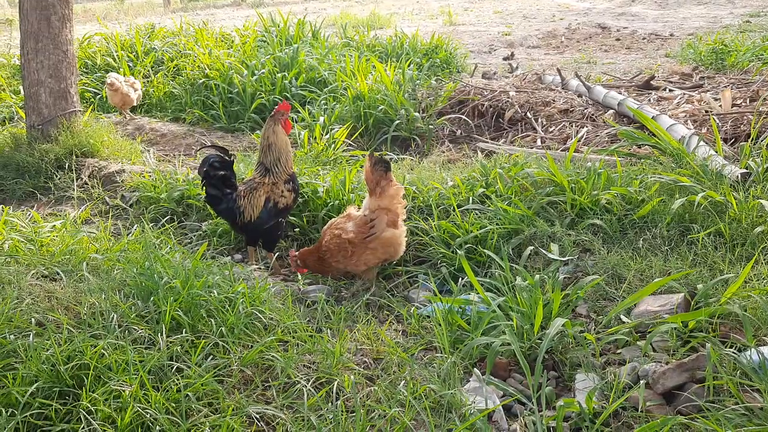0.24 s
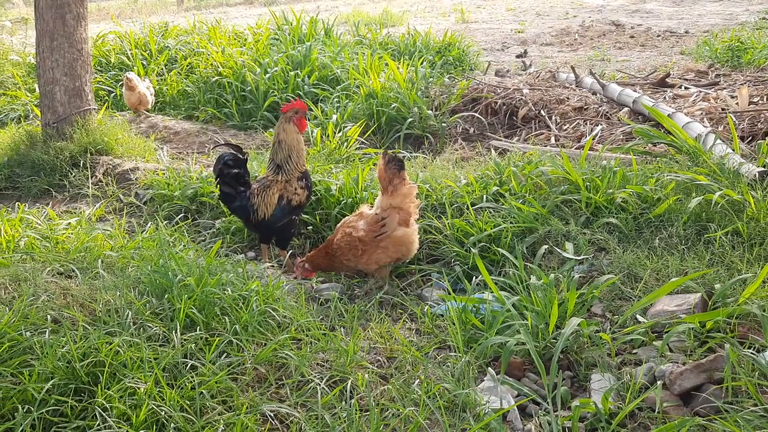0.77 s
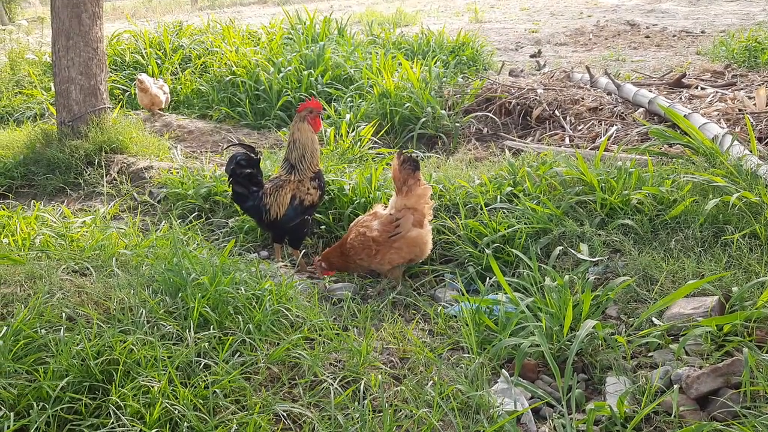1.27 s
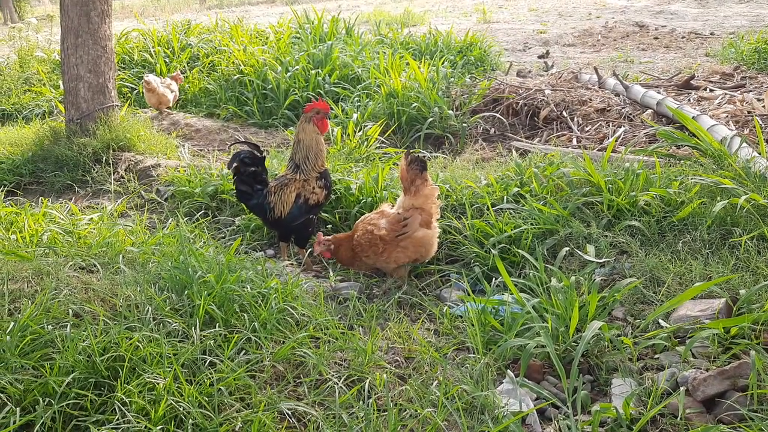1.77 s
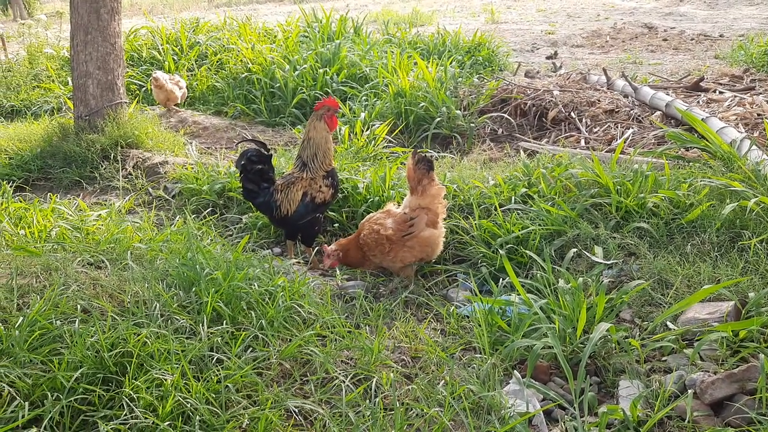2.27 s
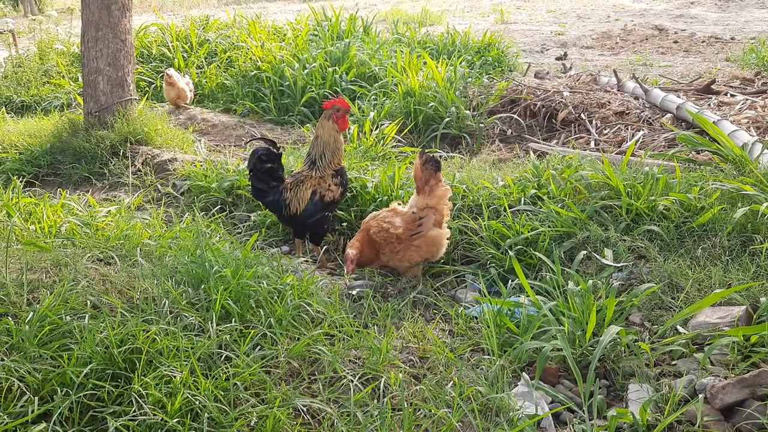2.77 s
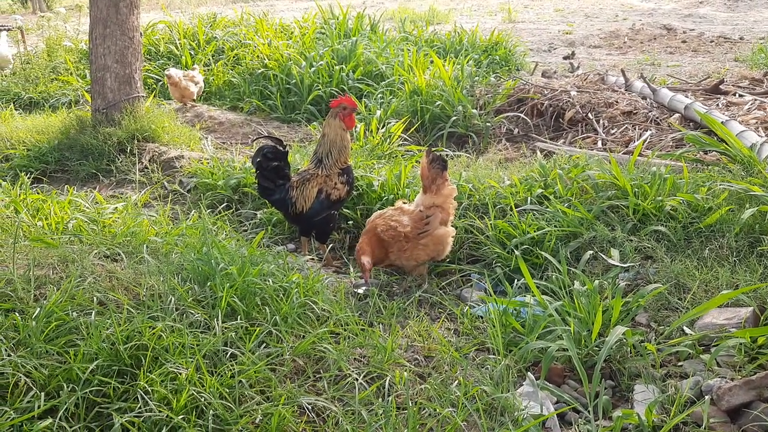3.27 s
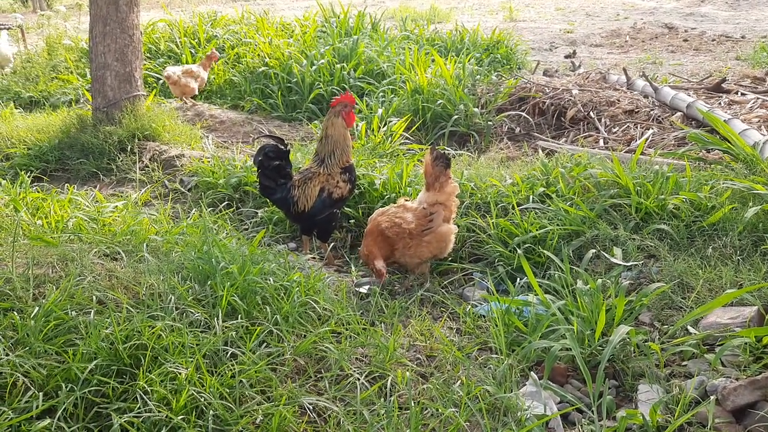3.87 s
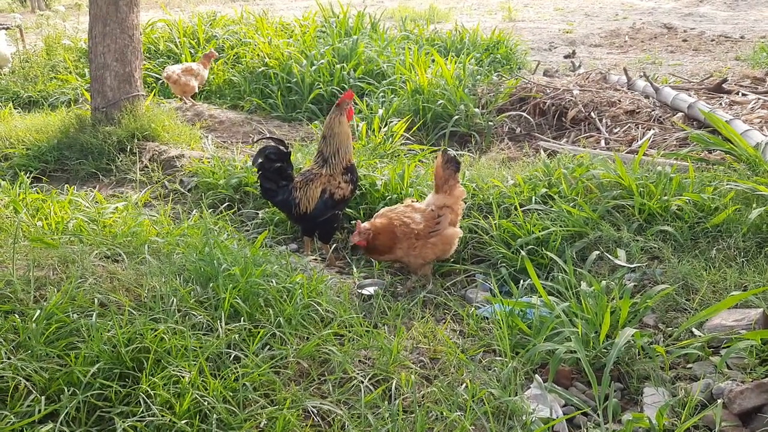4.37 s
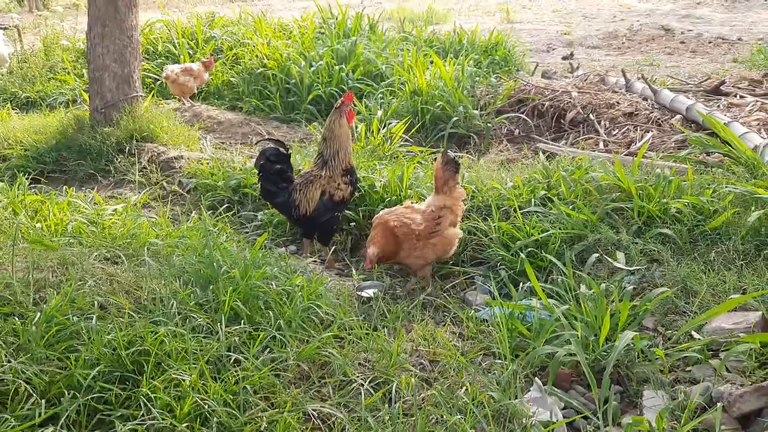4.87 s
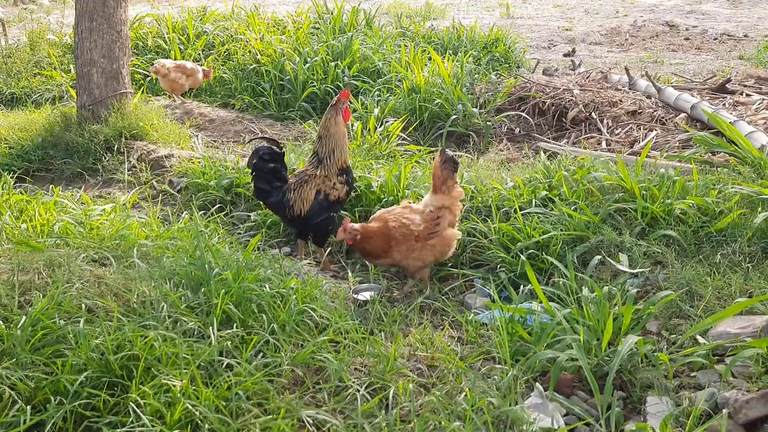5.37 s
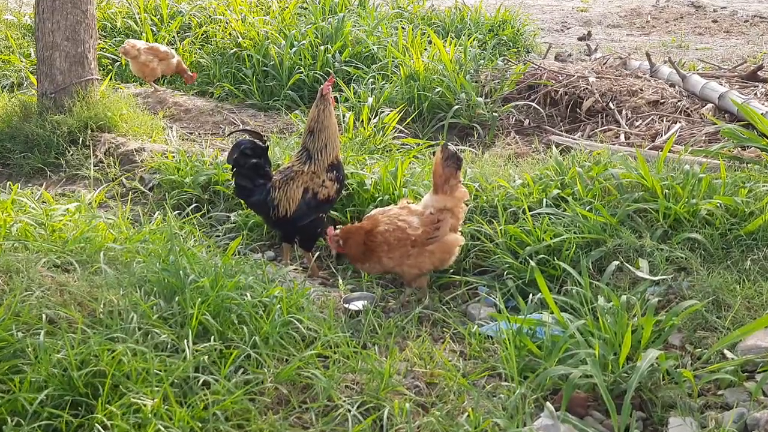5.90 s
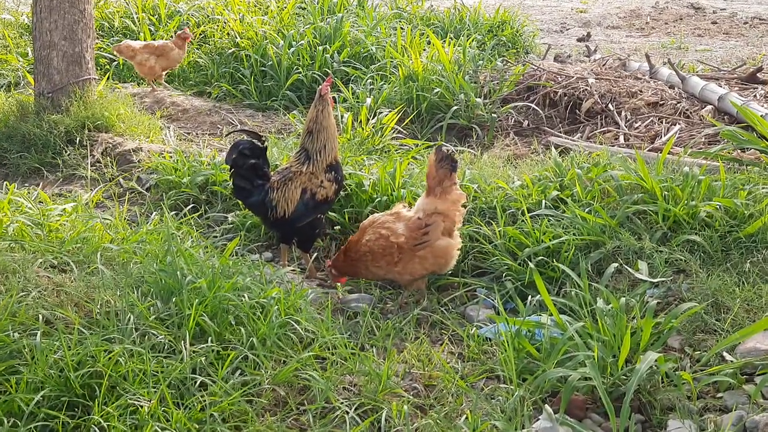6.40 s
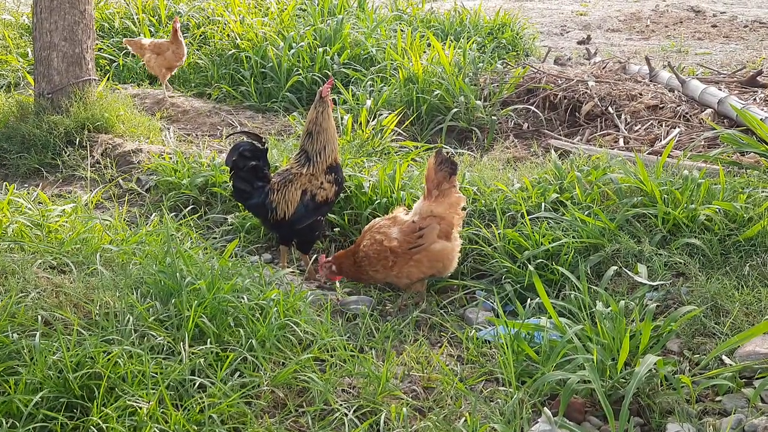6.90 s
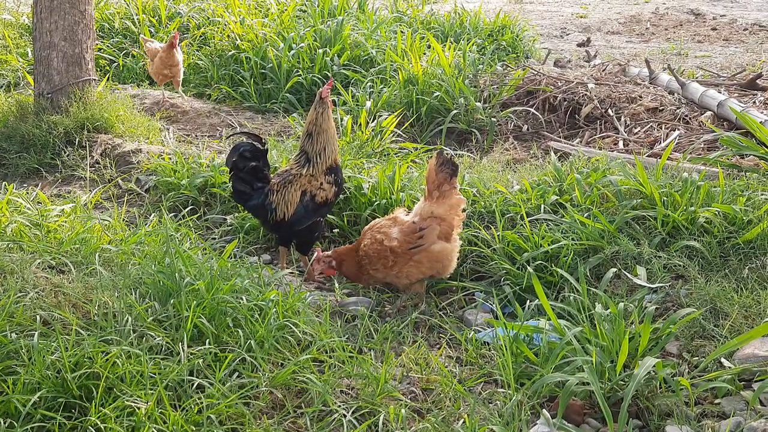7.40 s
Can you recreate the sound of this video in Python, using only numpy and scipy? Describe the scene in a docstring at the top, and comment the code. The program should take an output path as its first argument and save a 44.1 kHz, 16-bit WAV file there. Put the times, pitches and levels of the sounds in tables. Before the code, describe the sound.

Rural yard with quick bird chirps, distant drawn-out hen calls and soft clucks, loud handling bumps early on, and two sharp hen squawks near the end.

```python
"""A walled rural yard with chickens, heard through a hand-held camera's two microphone ports.
Nearest, a hen gives two shrill squawks; across the yard come soft clucks and, further off, drawn-out calls and hoots.
A small songbird whistles slurs and a run of chirps, other birds answer faintly, and the walls echo them all.
Fingers tap and rub the case beside the right port, then cover it and shut out the low rumble there.
Voices are harmonics and rasp, whistles gliding sines, taps ringing modes, the rest shaped noise."""
import sys
import numpy as np
from scipy import signal
from scipy.fft import rfft, irfft, next_fast_len
from scipy.io import wavfile
from scipy.ndimage import uniform_filter1d, map_coordinates

SR = 44100
rng = np.random.default_rng(int(sys.argv[2]) if len(sys.argv) > 2 else 0)


def persist_wave(psi):
    """Save psi, clipped to +-1, as 16-bit WAV."""
    counts = np.round(np.clip(psi, -1, 1) * 32767).astype(np.int16)
    wavfile.write(sys.argv[1], SR, np.atleast_2d(counts).T)


N = 337365
TOP_HZ = 16100  # the microphones' upper band limit


def amp(db):
    """Decibels to a linear gain."""
    return 10 ** (np.asarray(db) / 20)


def unit(x):
    """x scaled to rms 1."""
    return x / np.sqrt(np.mean(x ** 2) + 1e-20)


def along(points, hz):
    """Rows of (frequency_hz, value) read at hz along a log axis."""
    point_hz, values = np.transpose(points)
    return np.interp(np.log(hz + 1), np.log(point_hz + 1), values)


def curves(rows):
    """One value per sample of the whole scene for each column after the time."""
    times_s, *columns = np.transpose(rows)
    return [np.interp(np.arange(N) / SR, times_s, column) for column in columns]


def gesture(rows):
    """The columns of one call, sample by sample from its start to its end."""
    times_s, *columns = np.transpose(rows)
    t = np.arange(times_s[0], max(times_s[-1], times_s[0] + .01), 1 / SR)
    return [np.interp(t, times_s, column) for column in columns]


def wobble(rate, size):
    """A smooth random curve with rate knots a second."""
    knots = rng.standard_normal(int(size * rate / SR) + 4)
    return map_coordinates(knots, [np.arange(size) * rate / SR])


def filtered(x, response):
    """x with its spectrum multiplied by a function of frequency."""
    size = x.shape[-1]
    padded = next_fast_len(size + 8192)
    gains = response(np.fft.rfftfreq(padded, 1 / SR))
    return irfft(rfft(x, padded) * gains, padded)[..., :size]


def noise(spectrum):
    """Noise coloured by (frequency_hz, db) points, at rms 1."""
    return unit(filtered(rng.standard_normal(N), lambda hz: amp(along(spectrum, hz))))


def add(track, start_s, x):
    """Mix x into the track at start_s, trimmed to the track's ends."""
    start = round(start_s * SR)
    x = x[max(-start, 0):]
    part = track[max(start, 0):][:len(x)]
    part += x[:len(part)]


def whistle(rows, waver):
    """A nearly pure note: one sine whose pitch and strength are slightly unsteady."""
    hz, db = gesture(rows)
    size = len(hz)
    phase = 2 * np.pi * np.cumsum(hz * (1 + waver * wobble(160, size))) / SR
    strength = np.sqrt(2) * amp(db + 1.7 * wobble(64, size))
    return strength * np.sin(phase) * signal.windows.tukey(size, .1)


def sing(syllable, notes, waver):
    """One whistled syllable sung once for each row of (start_s, pitch_ratio, level_db)."""
    out = np.zeros(N)
    for start_s, ratio, db in notes:
        note = whistle(np.array(syllable) * [1, ratio, 1], waver)
        add(out, start_s + syllable[0][0], amp(db) * note)
    return out


def voice(hz, rough, throat, jitter):
    """Harmonics through a throat near rms 1; roughness shakes the pitch and adds rasp once a cycle."""
    size = len(hz)
    rough = np.clip(rough, 0, 1)
    phase = 2 * np.pi * np.cumsum(hz * (1 + jitter * rough * wobble(700, size))) / SR
    k = np.arange(1, 15)[:, None]  # harmonic numbers
    gains = amp(along(throat, k * hz)) * (k * hz < TOP_HZ)
    flutter = amp(3 * np.array([wobble(220, size) for _ in k]))
    harmonics = gains * flutter * np.sin(k * phase)
    tone = np.sqrt(2) * harmonics.sum(0) / np.linalg.norm(gains, axis=0)
    breath = rng.standard_normal(size) * (1 + np.cos(phase))
    rasp = unit(filtered(breath, lambda f: amp(along(throat, f))))
    return (np.sqrt(1 - rough ** 2) * tone + rough * rasp) * signal.windows.tukey(size, .08)


# pieces of the two squawks as the voice breaks; rows: start_s, pitch_hz, level_db, roughness (0-1)
SQUAWK_PIECES = [
    [(6.54, 781, -61, .35), (6.552, 860, -49, .35), (6.562, 1000, -45, .35), (6.572, 1214, -39, .5),
     (6.582, 1280, -42, .55)],
    [(6.572, 3667, -52, .15), (6.59, 3885, -39.5, .13), (6.612, 3962, -34, .12), (6.63, 3780, -36, .15),
     (6.647, 3520, -33.5, .15), (6.662, 3350, -52, .15)],
    [(6.655, 1242, -45, .5), (6.675, 1080, -43, .7), (6.69, 880, -52, .5)],
    [(6.662, 3575, -46, .05), (6.675, 3850, -40, .25), (6.693, 3960, -45, .2), (6.73, 3590, -53, .2)],
    [(6.822, 1700, -57, .35), (6.835, 1952, -44, .4), (6.85, 2284, -48, .35), (6.876, 2666, -46, .3),
     (6.902, 2480, -52, .5)],
    [(6.9, 2250, -43, .3), (6.91, 1980, -33, .2), (6.927, 1790, -37, .18), (6.945, 1520, -44, .3),
     (6.956, 1380, -54, .4)],
]
# resonance of the squawking throat: frequency_hz, gain_db
SQUAWK_THROAT = [(600, -49), (1300, -18), (2000, -19.5), (2700, -5), (3700, 5.5), (4400, -2), (5400, -9),
                 (6500, -3), (7800, -20), (9500, -25), (13000, -40), (16000, -45.5)]


def squawks():
    """A harsh start breaks into a shrill whistle and back; a second cry arches and falls."""
    out = np.zeros(N)
    for piece in SQUAWK_PIECES:
        hz, db, rough = gesture(piece)
        # the rougher the cry, the more its strength stutters
        stutter = unit(amp(9 * np.clip(rough, 0, .5) * wobble(260, len(hz))))
        cry = voice(hz, rough, SQUAWK_THROAT, jitter=.06)
        add(out, piece[0][0], amp(db) * stutter * cry)
    return out


# soft clucks across the yard: start_s, length_s, pitch_hz (mid-cluck), level_db
CLUCK_NOTES = [(3.286, 0.022, 423, -60.5), (3.34, 0.052, 447, -70.5), (3.686, 0.026, 233.7, -54),
               (3.714, 0.023, 243.5, -64), (3.911, 0.038, 258, -54.5), (4.089, 0.023, 301.4, -64.5)]
# resonance of the clucking throat: frequency_hz, gain_db
LOW_THROAT = [(250, -5.5), (480, 9), (800, 2.5), (1150, 3), (1800, 1), (2600, -37), (5000, -35.5)]


def clucks():
    """Short low voiced notes from across the yard, each sinking in pitch through its middle."""
    out = np.zeros(N)
    for start_s, length_s, hz, db in CLUCK_NOTES:
        size = int(length_s * SR)
        sinking_hz = hz * np.linspace(1.1, .9, size)
        cluck = voice(sinking_hz, 0.44, LOW_THROAT, jitter=0.18)
        add(out, start_s, amp(db) * np.sqrt(np.hanning(size)) * cluck)
    return out


# the far hen's call sags, climbs to a crest and drops: start_s (from the crest), pitch_hz, level_db
CALL_SHAPE = [(-.41, 1320, -4), (-.33, 1175, -8.5), (-.21, 1140, -10.5), (-.09, 1240, -5.5),
              (0, 1420, -1.5), (.06, 1290, -8.5), (.11, 1170, -19)]
# her calls: start_s (at the crest), pitch_ratio, level_db
CALLS = [(-.01, 1, -68), (.66, .98, -76), (2.28, 1, -65), (4.29, 1.02, -66), (4.77, 1.09, -78),
         (5.95, 1, -68), (7.66, 1, -66)]
# faint low hoots from far away: start_s, length_s, pitch_hz, level_db
FAR_HOOTS = [(.28, .3, 400.6, -64), (.85, 0.97, 254.8, -67.5), (2.352, 0.42, 605, -71)]


def far_calls():
    """Thin drawn-out whistled calls and level low hoots, slightly unsteady in strength."""
    out = sing(CALL_SHAPE, CALLS, waver=0.008)
    for start_s, length_s, hz, db in FAR_HOOTS:
        add(out, start_s, whistle([(0, hz, db), (length_s, hz, db)], waver=0.013))
    return out * amp(1.1 * wobble(23.5, N))


# the songbird's three syllables, each: start_s (within the syllable), pitch_hz, level_db
SLUR_SHAPE = [(0, 3770, -10), (.025, 4343, -9.5), (.055, 4920, -5.5), (.08, 5500, -1.5), (.092, 5700, -11),
              (.105, 5302, -23)]
PIP_SHAPE = [(0, 6570, 3.5), (.015, 6950, -5.5), (.04, 6900, -12), (.07, 6700, -26.5)]
FLICK_SHAPE = [(0, 4502, -5.5), (.012, 4250, -2), (.035, 3600, -13), (.045, 3875, -8), (.056, 5000, -1.5),
               (.066, 6200, -5.5)]
# its opening slurs: start_s, pitch_ratio, level_db
OPENING_SLURS = [(0.846, .95, -63), (1.085, 1.07, -57), (1.3, 1.014, -52), (1.504, 1, -52),
                 (1.7, .96, -54.5)]
# its run, each beat a high pip then a flick: start_s, pip_level_db, flick_level_db
RUN_BEATS = [(1.849, -53.5, -57), (2.059, -53, -57), (2.269, -55, -54.5), (2.474, -58.5, -57),
             (2.685, -51, -53), (2.901, -53.5, -57), (3.118, -54.5, -55.5), (3.333, -55.5, -59.5)]


def songbird():
    """Rising whistled slurs lead into a run of pips and flicks; the flicks sink in pitch as it goes on."""
    slur_pip_s, slur_pip_db = 0.13, -8  # a softer pip links each slur to the next
    flick_after_s, flick_ratio, flick_sag_per_s = .076, 0.96, 0.032
    pips = [(s + slur_pip_s, 1, db + slur_pip_db) for s, _, db in OPENING_SLURS[:-1]]
    pips += [(s, 1, db) for s, db, _ in RUN_BEATS]
    flicks = []
    for start_s, _, db in RUN_BEATS:
        ratio = flick_ratio - flick_sag_per_s * (start_s - RUN_BEATS[0][0])
        flicks.append((start_s + flick_after_s, ratio, db))
    song = sing(SLUR_SHAPE, OPENING_SLURS, waver=0.019)
    song += sing(PIP_SHAPE, pips, waver=0.019)
    return song + sing(FLICK_SHAPE, flicks, waver=0.019)


# another bird's falling chirp: start_s (within the chirp), pitch_hz, level_db
FALL_SHAPE = [(0, 5480, -1), (.045, 4457, 6), (.095, 3500, -0.5), (.15, 2946, -9.5)]
# its chirps: start_s, pitch_ratio, level_db
FALLING_CHIRPS = [(5.67, 1, -71), (5.955, 1.02, -68.5), (6.21, 1, -75), (7.08, .97, -67),
                  (7.445, 1.03, -69.5)]
# thin bent peeps of birds further off: start_s, length_s, start_hz, middle_hz, end_hz, level_db
BENT_PEEPS = [(0.817, .13, 3330, 3750, 3840, -66.5), (3.294, 0.15, 2150, 2410, 2290, -75),
              (3.336, 0.11, 1700, 1800, 1695, -73.5), (4.51, .05, 3850, 3950, 4700, -68),
              (4.57, .05, 3850, 3980, 4300, -69), (4.64, .18, 4760, 4450, 3900, -70),
              (4.87, .08, 4550, 4790, 4680, -67), (4.96, .13, 2275, 2540, 2620, -77),
              (5.12, .12, 4700, 4400, 4150, -68), (5.24, .06, 4700, 5400, 5700, -72),
              (5.28, .22, 4100, 3920, 4100, -72), (7.079, .08, 2100, 2187, 2150, -73.5)]


def other_birds():
    """Falling chirps and thin peeps, gliding sines whose strength flickers."""
    out = sing(FALL_SHAPE, FALLING_CHIRPS, waver=.04)
    u = np.linspace(0, 1, 12)
    for start_s, length_s, *pitches_hz, db in BENT_PEEPS:
        # a parabola through the three pitches
        bend_hz = np.polyval(np.polyfit([0, .5, 1], pitches_hz, 2), u)
        rows = np.column_stack([length_s * u, bend_hz, np.full_like(u, db)])
        add(out, start_s, whistle(rows, waver=0.014))
    return out * amp(1.5 * wobble(45, N))


# how long the yard's tail takes to die by 60 dB: frequency_hz, decay_s
YARD_DECAY = [(300, 0.2), (2000, 0.84), (4000, 0.68), (8000, 1), (15000, .3)]


def yard(x, walls, wet_db):
    """Direct sound, a few wall echoes and a scattered noise tail, at both ports."""
    hz, t, z = signal.stft(rng.standard_normal((2, SR)), SR, nperseg=256)
    decay = amp(-60 * t / along(YARD_DECAY, hz)[:, None])
    tail = signal.istft(z * decay, SR, nperseg=256)[1]
    tail = tail / np.linalg.norm(tail[0])
    out = amp(wet_db) * signal.fftconvolve(x[None], tail, axes=1)[:, :N]
    add(out[0], .0004, x)  # the left port is further from the birds
    add(out[1], 0, x)
    for delay_s, left_db, right_db in walls:
        add(out[0], delay_s, amp(left_db) * x)
        add(out[1], delay_s, amp(right_db) * x)
    return out


# fingers knocking on the case: start_s, thud_db, knock_db, tick_db, port_ring_db
FINGER_TAPS = [(0.19, -23, -30, -33, -14), (0.275, -24, -35, -13.5, -16), (0.528, -30, -39, -33, -13),
               (0.594, -29, -48, -15, -17), (0.7386, -29, -35, -20, -16), (0.7502, -3, -35, -8, -23),
               (0.7528, -19, -13.5, -15, -17), (0.7887, -16, -30, -5.5, -8.5),
               (0.8207, -19, -31, -12.5, -16), (1.8094, -5, -30, -17.5, -12.5),
               (1.8872, 13.5, 16.5, -2, 12), (1.8952, 8, 10, -26, 3.5), (1.9908, -10.5, -9, -34, -24),
               (2.4442, 12.5, 16, 5, 11.5), (2.5279, -19, -31, -12.5, -15.5), (2.7721, -29, -39, -22, -12),
               (3.53, 17.5, 19.5, 12, 16), (3.5375, 8, -17, -27.5, -28), (3.5469, 0.5, -26, -9, -23),
               (3.5582, -27.5, -12.5, -6.5, -4), (3.5603, 13, 3, -30, -34), (3.8898, 10, 16.5, 8.5, 13.5),
               (3.8999, 5, -27.5, -26, -14), (3.9917, 5, 4.5, -2, -17), (4.2858, 6.5, 8, 5.5, -70),
               (4.3437, 12, 20.5, 9, 9), (4.3723, 8.5, 12.5, 13, -28.5), (4.3837, 3.5, -23, 2.5, -31),
               (4.4042, 14.5, 7, -48, -3), (4.4611, -17, -21, -11, -7)]
# resonant modes of those four parts, each: centre_hz, width_hz, level_db (relative)
THUD_MODES = [(248, 285, -2.5), (560, 580, 0)]
KNOCK_MODES = [(1284, 710, -3), (2130, 1210, -7)]
TICK_MODES = [(3270, 650, -2.3), (4346, 660, -2)]
PORT_MODES = [(6410, 920, 2.5), (10550, 450, -1), (13500, 990, -29)]
# what passes through the case from right port to left: frequency_hz, gain_db
CASE_PATH = [(150, -28.5), (550, -11), (1200, -23.5), (2500, -27.5), (6000, -40.5), (15000, -45.5)]


def taps():
    """Each knock rings the case and the right port; only a dull, smeared thud reaches the left one."""
    out = np.zeros((2, N))
    t = np.arange(2048) / SR
    f = np.fft.rfftfreq(len(t), 1 / SR)
    fade = np.cos(np.pi / 2 * t / t[-1]) ** 2  # each tap's ringing fades smoothly to silence by its end
    for start_s, *levels_db in FINGER_TAPS:
        response = 0
        for db, modes in zip(levels_db, (THUD_MODES, KNOCK_MODES, TICK_MODES, PORT_MODES)):
            for hz, width, mode_db in modes:
                # the finger's load shifts the modes
                centre = hz * (1 + .06 * rng.standard_normal())
                # a fleshy contact cannot shake a mode far above its pitch
                soft = 1 + 1j * f / (4.1 * centre)
                ring = 1j * f * width / (centre ** 2 - f ** 2 + 1j * f * width)
                response = response + amp(db + mode_db) * ring / soft ** 2
        rattle = rng.standard_normal((2, len(t))) * amp(-60 * t / 0.039)  # dies by 60 dB in 0.039 s
        rattle = rfft(rattle / np.linalg.norm(rattle[0])) * amp(along(CASE_PATH, f))
        add(out[0], start_s, fade * irfft(response * rattle[0] * amp(-1.5)))
        add(out[1], start_s, fade * irfft(response * (1 + rattle[1] * amp(4.5))))
    return out


# strokes of skin over the case: start_s, length_s, hiss_db, scrape_db (before the port balance)
SKIN_STROKES = [(0, 0.53, -74, -72), (0.517, 0.33, -64.5, -61.5), (.85, 0.26, -74, -71.5),
                (1.772, .22, -80, -65), (2.25, 0.14, -70, -69.5), (2.443, 0.26, -72, -65.5),
                (2.724, 0.21, -63.5, -61), (3.044, 0.32, -67, -72.5), (3.779, 0.083, -53, -87),
                (3.895, 0.073, -69, -64), (3.994, 0.096, -59.5, -85), (4.365, 0.12, -71, -60)]
# spectra of the skin's hiss and of its scrape, each: frequency_hz, level_db (relative)
SKIN_HISS = [(1500, -21.5), (4000, -6), (6800, 6), (9500, -4.5), (11500, 1), (15500, -1.5)]
SKIN_SCRAPE = [(1000, -10), (1900, -22), (2400, 0), (3200, -6), (4200, -2), (6500, -0.5), (8000, -14.5),
               (12000, -16)]


def rubbing():
    """Skin slides over the case in strokes of tiny slips and crackles until the finger comes to rest."""
    edge_s = 0.025  # how softly a stroke starts and stops
    creep_hiss_db, creep_scrape_db, rest_s = -81.5, -70, 4.5  # fingers creep between strokes, then rest
    catches_per_s, catch_spread_db = 150, 3.5  # tiny catches of the skin on the case
    t = np.arange(N) / SR

    def after(s):
        """A soft step from 0 to 1 at time s."""
        return .5 + .5 * np.tanh((t - s) / (2 * edge_s))

    creeping = 1 - after(rest_s)
    slide = amp(creep_hiss_db) * creeping
    pressure = amp(creep_scrape_db) * creeping
    for start_s, length_s, hiss_db, scrape_db in SKIN_STROKES:
        stroke = after(start_s) - after(start_s + length_s)
        slide = slide + amp(hiss_db) * stroke
        pressure = pressure + amp(scrape_db) * stroke
    slips = unit(amp(3.2 * wobble(450, N)))
    catch_sizes = amp(catch_spread_db * rng.standard_normal(N))
    catches = (rng.random(N) < catches_per_s / SR) * catch_sizes
    crackle = unit(filtered(catches, lambda hz: amp(along(SKIN_SCRAPE, hz))))
    hiss = amp(1.5 * wobble(60, N)) * np.array([noise(SKIN_HISS), noise(SKIN_HISS)])
    scrape = .65 * slips * np.array([noise(SKIN_SCRAPE), noise(SKIN_SCRAPE)]) + .75 * crackle
    return slide * hiss + pressure * scrape * amp([[-8], [3]])  # the scrape is stronger at the right port


# strength of the low outdoor rumble before its quick unevenness: time_s, level_db
RUMBLE_LEVEL = [(0.01, -51), (0.36, -47), (1.93, -49.5), (4.45, -49.5), (4.69, -52.6), (4.92, -48),
                (5.04, -53), (5.29, -49.5), (6.73, -48), (7.65, -51.5)]
# the finger closing over the right port: time_s, share_covered (0-1)
PORT_COVER = [(0, 0), (4.925, 0.021), (4.955, 0.99), (7.65, 0.99)]
# spectrum of the rumble in open air: frequency_hz, level_db (relative)
AIR_SPECTRUM = [(20, -37.5), (40, -10.5), (55, 6.5), (115, 0), (250, -9.5), (400, -25), (700, -34),
                (1100, -41.5), (2000, -39.5), (5000, -51.5)]
# what still passes the covering finger: frequency_hz, gain_db
COVERED_GAIN = [(30, -15), (110, -43), (240, -19), (390, 5.5), (700, -5), (2000, -3)]
# hiss spectra of the two ports, each: frequency_hz, level_db (relative)
LEFT_HISS = [(500, -21), (2000, -9.5), (3000, 1.5), (4200, 13.5), (5300, -14), (6500, 19.5), (7600, 6),
             (8800, 14.5), (9300, -38.5), (16000, -26)]
RIGHT_HISS = [(500, -35.5), (2000, -12.5), (3100, -17.5), (4200, 0), (5400, -7.5), (6500, 10), (7100, 0.5),
              (7700, -16), (8800, -7.5), (9400, -46.5), (16000, -34.5)]


def background():
    """Low outdoor rumble noise, shut out on the right by the finger, and the hiss of both ports."""
    rumble_db, cover = curves(RUMBLE_LEVEL)[0], np.clip(curves(PORT_COVER)[0], 0, 1)
    # the ports differ more towards the treble
    difference = [(60, -19), (200, -11.5), (500, -9.5), (1000, -0.5)]
    shared = noise(AIR_SPECTRUM)
    apart = filtered(noise(AIR_SPECTRUM), lambda hz: amp(along(difference, hz)))
    strength = amp(rumble_db + 1.17 * wobble(14, N))  # quick unevenness in dB
    left, right = strength * np.array([shared + apart, shared - apart])
    muffled = filtered(right, lambda hz: amp(along(COVERED_GAIN, hz)))
    right = (1 - cover) * right + cover * muffled
    hiss = np.array([amp(-71.5) * noise(LEFT_HISS), amp(-60.5) * noise(RIGHT_HISS)])
    return np.array([left, right]) + hiss * amp(.5 * wobble(14.0, N))


# spectrum of the far wash: frequency_hz, level_db (relative)
WASH_SPECTRUM = [(200, -15), (380, 5), (560, -4.5), (760, -5.5), (1000, -15), (1800, -31.5), (3500, -35)]
# level of the far wash before the port balance: time_s, level_db
WASH_LEVEL = [(0.0, -66.5), (0.47, -79.5), (0.96, -71), (2.77, -72), (2.94, -85.5), (3.53, -66.5),
              (3.83, -64), (5.11, -75.5), (5.58, -67), (6.77, -68.5), (7.29, -71.5), (7.65, -66.5)]


def bustle():
    """A faint far-off wash of village sound: noise that shifts in patches of pitch and time."""
    z = signal.stft(np.array([noise(WASH_SPECTRUM), noise(WASH_SPECTRUM)]), nperseg=2048)[2]
    patches = uniform_filter1d(rng.standard_normal(z.shape[1:]), size=4, axis=0)
    patches = uniform_filter1d(patches, size=5, axis=1)
    pair = signal.istft(z * amp(4.1 * unit(patches)), nperseg=2048)[1][:, :N]
    return amp(curves(WASH_LEVEL)[0]) * unit(pair) * amp([[3], [1]])


# wall echoes of the squawks, the small birds and the far hens, each: delay_s, left_db, right_db
SQUAWK_ECHOES = [(.009, -15, -4), (0.021, -15, -14), (0.046, -20, -14), (0.076, -25, -13.5)]
TREE_ECHOES = [(0.014, -16.5, -11), (.027, -13.5, -22.5), (0.045, -12.5, -12), (.062, -7, -12.5),
               (.105, -12, -18.5)]
FIELD_ECHOES = [(.019, -8, -6.5), (.043, -19.5, -9.5)]
# a dip above the port ring, applied to the taps at both ports: frequency_hz, gain_db
PORT_CANCELLATION = [(7500, 1), (8800, -8.5), (10200, -12), (12500, -1.5), (16000, -2)]


def scene():
    """Birds across the yard, fingers on the camera and the outdoor background, as (left, right)."""
    # each column of dB balances the left and right ports
    near = yard(squawks(), SQUAWK_ECHOES, wet_db=-10) * amp([[-1], [2]])
    small = yard(songbird() + other_birds(), TREE_ECHOES, wet_db=-1.0) * amp([[-6], [2]])
    far = yard(clucks() + far_calls(), FIELD_ECHOES, wet_db=-8.5) * amp([[-1], [1]])
    knocks = filtered(taps(), lambda hz: amp(along(PORT_CANCELLATION, hz)))
    return near + small + far + knocks + rubbing() + background() + bustle()


def record(dry):
    """The camera clips at full scale, then fades out everything above its band limit."""
    edge_hz = 500  # width of the fade
    return filtered(np.clip(dry, -1, 1), lambda hz: np.clip((TOP_HZ - hz) / edge_hz + .5, 0, 1))


dry = scene()
out = record(dry)
persist_wave(out)
```